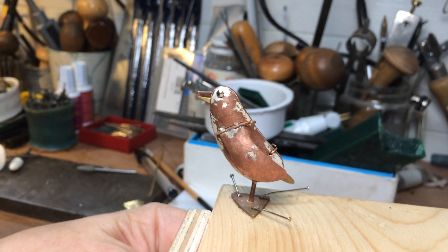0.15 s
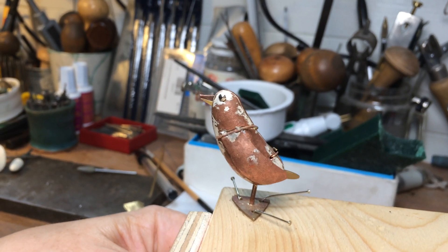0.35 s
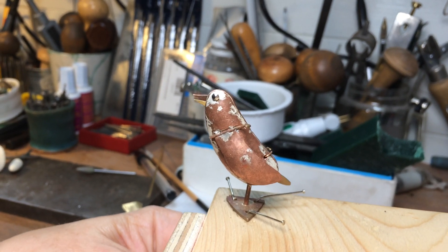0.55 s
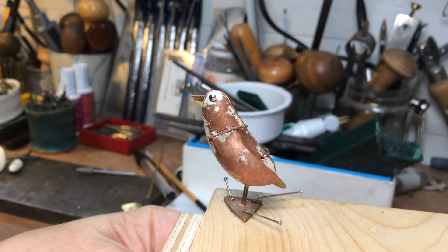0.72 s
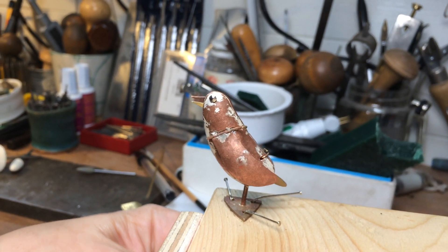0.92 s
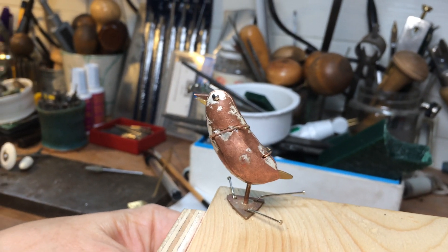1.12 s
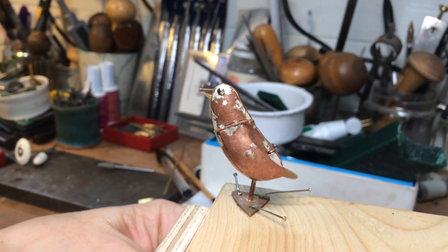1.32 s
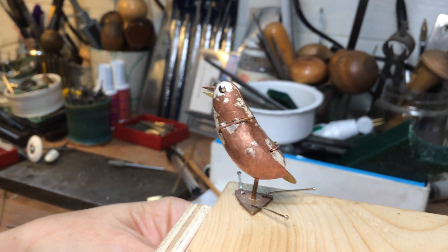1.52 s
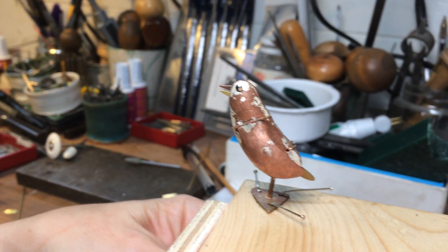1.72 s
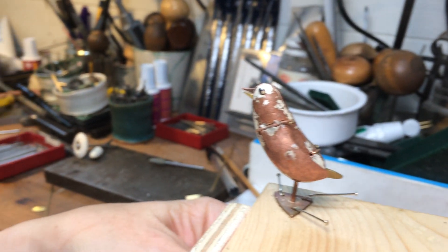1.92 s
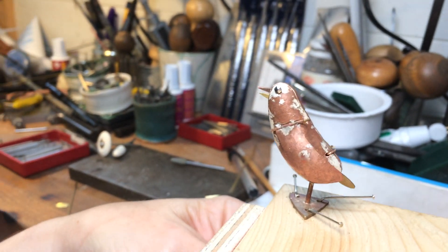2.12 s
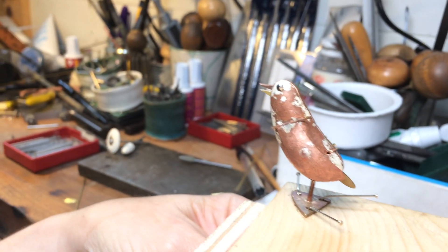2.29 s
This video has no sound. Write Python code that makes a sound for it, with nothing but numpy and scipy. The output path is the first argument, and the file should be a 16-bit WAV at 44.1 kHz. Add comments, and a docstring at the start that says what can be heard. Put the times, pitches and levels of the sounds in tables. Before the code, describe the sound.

Sharp clicks and a wooden knock from a small hand-cranked metal bird in a quiet workshop

```python
"""In a quiet workshop, a hand cranks a small sheet-metal bird on a wooden box, close to the microphone.
A cam follower slides, drops and clicks, wires tick, and the box knocks and thumps in the hand.
Metal, wood and wires ring as sums of fading sine waves; slides are showers of tiny slips that ring them.
Thumps are low fading tones. A short room echo and a patchy noise for the workshop air lie around it all."""
import sys
import numpy as np
from scipy import signal
from scipy.fft import rfft, irfft
from scipy.io import wavfile
from scipy.ndimage import uniform_filter1d

SR = 44100
rng = np.random.default_rng(int(sys.argv[2]) if len(sys.argv) > 2 else 0)


def boost(x):
    """Linear amplitude factor 10**(x/20) for a level x in decibels (scalar or array-like)."""
    u = np.asarray(x, float) / 20
    return 10 ** u


def generate_wav(signal):
    """Clip the signal to [-1, 1] and save it as 16-bit WAV at the path in sys.argv[1]."""
    frames = np.transpose(np.atleast_2d(signal))
    scaled = np.clip(frames, -1, 1) * 32767
    pcm = np.round(scaled).astype(np.int16)
    wavfile.write(sys.argv[1], SR, pcm)


N = 103635  # length in samples

# Workshop air, its loudness over pitch before overall scaling: (pitch [Hz], level [dB])
AIR_COLOUR = [(12, -47.5), (20, 2.5), (58, -3), (131, -5.5), (179, -13.5), (218, -13), (583, -19),
              (1080, -20.5), (1180, -23), (1950, -23.5), (3420, -29), (12100, -32.5), (16500, -41.5)]
# Wire ticks: (time [s], level [dB])
WIRE_TICKS = [(.174, -60), (.259, -70), (.348, -48), (0.3518, -53), (0.36, -52), (.362, -43), (0.3687, -46),
              (0.3791, -52.5), (.386, -63.5), (.413, -46), (.6077, -47), (.614, -63), (0.625, -52.5),
              (.783, -59), (.817, -61), (1.0575, -56.5), (1.1297, -39), (1.2383, -53), (1.242, -60.5),
              (1.4477, -47.5), (1.4583, -57), (1.564, -63), (1.883, -53.5), (1.903, -44), (2.176, -52.5),
              (2.181, -59), (2.232, -60.5), (2.247, -60), (2.336, -60)]
# How long the room echo takes to fall by 60 dB: (pitch [Hz], fall time [s])
ROOM_FADE = [(300, 0.16), (1000, 0.15), (3000, 0.11), (8000, 0.093), (15000, 0.095)]
# Soft knocks on the box; the spot struck favours modes near one pitch:
# (time [s], level [dB], contact time [ms], favoured pitch [Hz])
BOX_KNOCKS = [(.197, -47, 2.4, 251), (.2035, -16.5, 0.49, 630), (.2102, -9, 0.96, 641),
              (.2185, -57, 0.41, 500), (.225, -57, 0.29, 650), (.321, -38.5, 0.46, 292),
              (.5770, -35.5, 2, 630), (.782, -50.5, 0.28, 783), (.797, -52, .4, 790),
              (.809, -52.5, 0.44, 746), (.8930, -40.5, 0.44, 340), (.899, -59, 0.94, 202),
              (.950, -57, 0.41, 650), (1.0105, -49.5, .3, 900), (1.055, -30.5, 0.68, 326),
              (1.402, -54, 0.39, 617), (1.758, -50.5, 0.34, 628), (1.829, -36, 1.1, 332),
              (2.118, -59, 0.55, 695), (2.153, -53, .4, 890), (2.2720, -35.5, 0.66, 500),
              (2.281, -78, 3.3, 298)]
# The box shifts in the hand: (time [s], level [dB], pitch [Hz])
BOX_THUMPS = [(.200, -32, 148.9), (.655, -54, 134), (.915, -46.5, 165), (.322, -46, 130), (.578, -42, 88),
              (.612, -48, 92), (.897, -37, 80), (1.052, -39, 96), (1.515, -45, 104), (1.615, -60, 101),
              (1.762, -45.5, 102), (1.826, -44.5, 100), (2.278, -47.5, 102.7)]
# The follower rubs along the cam:
# (time [s], length [s], metal level [dB], wood level [dB], wire level [dB])
CAM_SLIDES = [(.202, 0.012, -64, -31.5, -69), (.341, 0.0089, -53, -42, -68),
              (.322, 0.079, -58, -73.5, -70.5), (.404, 0.011, -41.5, -63, -64),
              (.565, 0.061, -66.5, -59, -69.5), (.69, 0.16, -75, -76, -83.5),
              (1.02, 0.043, -77, -60, -78.5), (1.119, 0.01, -46, -54, -72),
              (1.238, 0.02, -68.5, -75, -64.5), (1.42, 0.063, -66, -59.5, -67),
              (1.797, 0.0294, -64, -65, -106), (1.879, 0.0053, -60, -70, -60),
              (1.894, 0.015, -44, -55, -58.5), (2.145, 0.07, -68, -65.5, -76),
              (2.228, 0.043, -71, -63, -73)]
# Follower blows, levels before the bass is cut:
# (time [s], metal level [dB], wood level [dB], wire level [dB], snap level [dB])
FOLLOWER_CLICKS = [(.2035, -57, -27.5, -72, -59), (.2100, -58, -38, -78, -65),
                   (.3422, -42, -35.5, -49, -71), (.4048, -37.5, -67, -40.5, -64),
                   (.4160, -21, -69, -27.5, -10), (.4200, -42.5, -30.5, -39, -57),
                   (.5850, -68.5, -86, -65, -80), (.5993, -48.5, -40, -82, -53),
                   (.6305, -60, -55.5, -70, -81), (.6915, -58, -67, -80, -74),
                   (.7597, -45.5, -60, -66, -60), (1.0365, -49, -68, -60, -64),
                   (1.0465, -35, -31.5, -42, -72), (1.0512, -38, -70, -39, -33),
                   (1.1200, -51, -40, -56, -67), (1.1330, -21, -27.5, -27, -13),
                   (1.4165, -59, -75, -66, -61), (1.4280, -49.5, -65, -65, -55.5),
                   (1.4388, -52, -37, -55, -50), (1.4535, -66, -77, -61.5, -64),
                   (1.4625, -45.5, -46, -49.5, -54), (1.4870, -58, -53, -64, -70),
                   (1.5070, -54, -55.5, -74, -67), (1.5320, -43, -62, -49, -43),
                   (1.8100, -50, -63, -64, -55), (1.8212, -32, -29.5, -38.5, -31.5),
                   (1.8262, -57, -39.5, -41.5, -33), (1.8945, -45, -46, -52.5, -58),
                   (1.9080, -23, -34, -30.5, -15), (2.1275, -59.5, -61, -79.5, -74),
                   (2.1670, -51, -38.5, -61, -49), (2.1995, -82, -53, -70, -64),
                   (2.2645, -74, -82, -73, -78), (2.3020, -51.5, -52.5, -66, -50)]
# Ringing modes of each body, before small random changes; the lingering part falls 60 dB in the fall time:
# (pitch [Hz], level [dB], fall time [s])
METAL_MODES = [(1037, -0.5, 0.045), (1352, 2.5, .028), (1520, -8.5, 0.075), (1825, -15.5, 0.062),
               (2070, -4.5, .025), (2374, -3.5, .035), (2675, -4.5, 0.056), (2814, -9.5, 0.017),
               (3053, -4, 0.024), (3058, -4.5, .035), (3245, -4, 0.069), (3635, -20, .03),
               (4049, -6, 0.038), (4420, -22.5, 0.016), (5300, 3, 0.01)]
WOOD_MODES = [(165, -10, 0.081), (220, -12.5, 0.092), (333, -4.5, 0.058), (417, -8, .035), (500, -4, 0.013),
              (562, -10, 0.047), (631.3, 0.5, 0.044), (706.5, -6, 0.028), (768.7, -0.5, 0.041),
              (847, -4.5, .035), (1107, -10, 0.043), (1350, -9.5, 0.033), (1445, -14.5, 0.048),
              (1760, -17.5, .02)]
WIRE_MODES = [(5330, -10, .012), (6420, 4.5, 0.0047), (7300, 3, .012), (8310, 2.5, 0.0114),
              (9140, -2.5, .011), (9970, -1.5, 0.02), (11300, 1.5, .011), (11420, -4.5, 0.0037),
              (12900, 8.5, 0.0035), (14850, -1.5, 0.0058), (14840, -9, .008)]

AIR_DB, PATCH_DB = -65.5, 1.38  # overall air level; strength of its patches
LUMP_DB, LUMP_HZ = 2.0, 200  # slow swaying of the air, strongest below this pitch
RING_SAMPLES = 5000
VARY_DB, DETUNE = 1.5, 0.01  # each blow lands a little differently; detune is a share of the pitch
LINGER_DB, QUICK = -5.5, 0.3  # a weaker part lingers; the rest takes this share of the fall time
FLUTTER, FLUTTER_S = 1, 0.0026  # loose joints make the lingering ring flutter
RISE_CYCLES, KNOCK_RISE_CYCLES = 0.33, 1  # cycles a mode needs to swell in
SPOT_SLOPE_DB, KNOCK_SLOPE_DB = 5.5, 12.5  # loss per squared octave from the favoured pitch
CRACKLE_DB, CRACKLE_T60_S, CRACKLE_LOW_HZ = -5, 0.011, 5600
ROOM_DB = -18
THUMP_RISE_S, THUMP_T60_S = 0.0021, 0.052
SLIPS_PER_S, SLIP_SPREAD_DB = 3000, 2.5
SLIDE_EDGE = 0.24  # share of a slide spent fading in, and again fading out
RUB_HZ, RUB_DAMP_T60_S = 3270, 0.026  # rubbing favours metal near this pitch and damps the ring
SNAP_DELAY_S, SNAP_WIDTH_S = 0.000722, 0.00007  # the follower bottoms out just after first contact
CLICK_LOW_HZ = 457  # small parts give off little bass
MIC_LOW_HZ, MIC_TOP_HZ = 40, 15020


def evened(x):
    """Scales a signal so its average strength (rms) is 1."""
    return x / np.sqrt(np.mean(x ** 2) + 1e-20)


def read(points, hz):
    """Reads between table points along a logarithmic pitch axis."""
    f, value = np.transpose(points)
    return np.interp(np.log(hz + 1), np.log(f + 1), value)


def band(x, hz, kind, order):
    """Cuts away the sound below or above a pitch with a Butterworth filter."""
    return signal.sosfilt(signal.butter(order, hz, kind, fs=SR, output="sos"), x)


def add(mix, s, sound):
    """Mixes a sound in at time s."""
    part = mix[round(s * SR):][:len(sound)]
    part += sound[:len(part)]


def air():
    """Workshop hush: coloured noise whose strength varies in patches and sways in the bass."""
    frames, hz = N // 256 + 5, np.fft.rfftfreq(1024, 1 / SR)
    patches = rng.standard_normal((frames, 513)).T
    patches = uniform_filter1d(patches, size=12, axis=0)  # smooth over pitch
    patches = evened(uniform_filter1d(patches, size=10, axis=1))  # smooth over time
    sway = evened(uniform_filter1d(rng.standard_normal(frames), size=5))
    lumps = sway / (1 + (hz[:, None] / LUMP_HZ) ** 2)
    colour = boost(read(AIR_COLOUR, np.fft.rfftfreq(N, 1 / SR)))
    noise = irfft(rfft(rng.standard_normal(N)) * colour, N)
    spectrum = signal.stft(noise, nperseg=1024, noverlap=768)[2]
    change = boost(PATCH_DB * patches + LUMP_DB * lumps)[:, :spectrum.shape[1]]
    hush = signal.istft(spectrum * change, nperseg=1024, noverlap=768)[1][:N]
    return boost(AIR_DB) * evened(hush)


def ring(modes, favoured_hz=None, rise_cycles=RISE_CYCLES, slope_db=SPOT_SLOPE_DB):
    """A struck body: each mode swells in quickly, then dies away as a quick and a lingering part."""
    hz, db, t60 = np.transpose(modes)[:, :, None]
    if favoured_hz:
        db = db - slope_db * np.log2(hz / favoured_hz) ** 2
    t = np.arange(RING_SAMPLES) / SR
    level_chance, pitch_chance = rng.standard_normal((2, len(modes), 1))
    knots = rng.standard_normal((len(modes), 400))
    wobble = np.array([np.interp(t / FLUTTER_S, np.arange(400), k) for k in knots])
    quick = boost(-60 * t / (QUICK * t60))
    lingering = (1 + FLUTTER * wobble) * boost(LINGER_DB - 60 * t / t60)
    swell = 1 - np.exp(-t * hz / rise_cycles)
    strength = swell * (quick + lingering) * boost(db + VARY_DB * level_chance)
    tones = np.sin(2 * np.pi * hz * (1 + DETUNE * pitch_chance) * t)
    return -(strength * tones).sum(0) / np.linalg.norm(boost(db))


def tick(db):
    """Wires ring briefly, with a short burst of bright hiss as crackle."""
    hiss = band(rng.standard_normal(RING_SAMPLES), CRACKLE_LOW_HZ, "high", order=3)
    fade = boost(CRACKLE_DB - 60 * np.arange(RING_SAMPLES) / SR / CRACKLE_T60_S)
    return boost(db) * (ring(WIRE_MODES) + fade * hiss)


def room(x):
    """Room echo: sparse random reflections, each pitch dying at its own speed."""
    taps = np.zeros(SR // 2)
    at = np.arange(120, len(taps) - 20, 20)
    taps[at + rng.integers(0, 20, len(at))] = rng.choice([-1., 1.], len(at))
    hz, t, spectrum = signal.stft(taps, SR, nperseg=256)
    fade = boost(-60 * t / read(ROOM_FADE, hz)[:, None])
    tail = signal.istft(spectrum * fade, SR, nperseg=256)[1]
    return signal.fftconvolve(x, tail / np.linalg.norm(tail))[:N]


def knock(db, contact_ms, favoured_hz):
    """A soft knock: a rounded push dulls the ring of the box."""
    t = np.arange(300) / SR * 1000 / contact_ms  # counted in contact times
    push = t * np.exp(-8 * t)
    body = ring(WOOD_MODES, favoured_hz, KNOCK_RISE_CYCLES, KNOCK_SLOPE_DB)
    return boost(db) * np.convolve(body, push / push.sum())


def thump(db, hz):
    """The box shifts in the hand: a low tone that swells and dies."""
    t = np.arange(8000) / SR
    swell = np.minimum(t / THUMP_RISE_S, 1)
    return boost(db - 60 * t / THUMP_T60_S) * swell * np.sin(2 * np.pi * hz * t)


def slide(length, metal_db, wood_db, wire_db):
    """The follower rubs: tiny uneven slips set metal, wood and wires ringing."""
    u = np.arange(0, 1, 1 / (length * SR))  # 0 to 1 along the slide
    chance, size, side = rng.random((3, 9000))
    slips = (chance < SLIPS_PER_S / SR) * boost(-SLIP_SPREAD_DB * np.log(size)) * np.sign(side - .5)
    slips = evened(slips)[:len(u)] * np.clip(np.minimum(u, 1 - u) / SLIDE_EDGE, 0, 1)
    damp = boost(-60 * np.arange(RING_SAMPLES) / SR / RUB_DAMP_T60_S)
    metal, wood, wire = damp * ring(METAL_MODES, RUB_HZ), damp * ring(WOOD_MODES), tick(0)
    bodies = ((metal_db, metal), (wood_db, wood), (wire_db, wire))
    response = sum(boost(db) * body / np.linalg.norm(body) for db, body in bodies)
    return signal.oaconvolve(slips, response)


def click(metal_db, wood_db, wire_db, snap_db):
    """The follower drops: metal and box ring at contact, wires join in, and a sharp snap follows."""
    u = (np.arange(RING_SAMPLES) / SR - SNAP_DELAY_S) / SNAP_WIDTH_S
    snap = boost(snap_db) * (u ** 2 - 1) * np.exp(-u ** 2 / 2)
    out = snap + boost(metal_db) * ring(METAL_MODES) + boost(wood_db) * ring(WOOD_MODES)
    add(out, SNAP_DELAY_S / 2, tick(wire_db))  # halfway to the snap
    return band(out, CLICK_LOW_HZ, "high", order=3)


def scene():
    """The mechanism, its room echo and the workshop air."""
    toy = np.zeros(N)
    layers = ((WIRE_TICKS, tick), (BOX_KNOCKS, knock), (BOX_THUMPS, thump),
              (CAM_SLIDES, slide), (FOLLOWER_CLICKS, click))
    for table, source in layers:
        for s, *row in table:
            add(toy, s, source(*row))
    return (toy + boost(ROOM_DB) * room(toy) + air())[None]


def top_cut(x):
    """Nothing passes above the cut-off."""
    return signal.sosfilt(signal.butter(12, 16650, fs=SR, output="sos"), x)


def record(dry):
    """The microphone trims both ends of the pitch range."""
    mix = band(dry, MIC_LOW_HZ, "high", order=4)
    mix = band(mix, MIC_TOP_HZ, "low", order=8)
    return top_cut(mix)


dry = scene()
out = record(dry)
generate_wav(out)
```